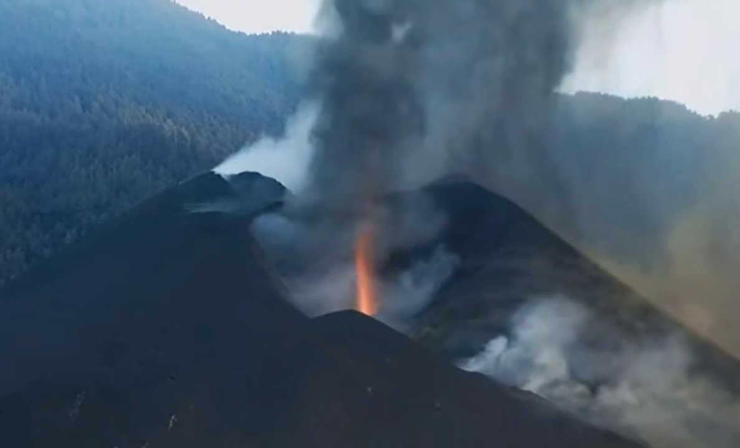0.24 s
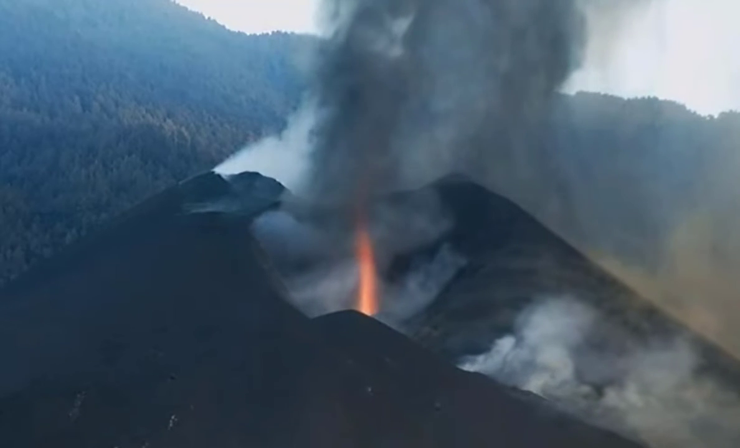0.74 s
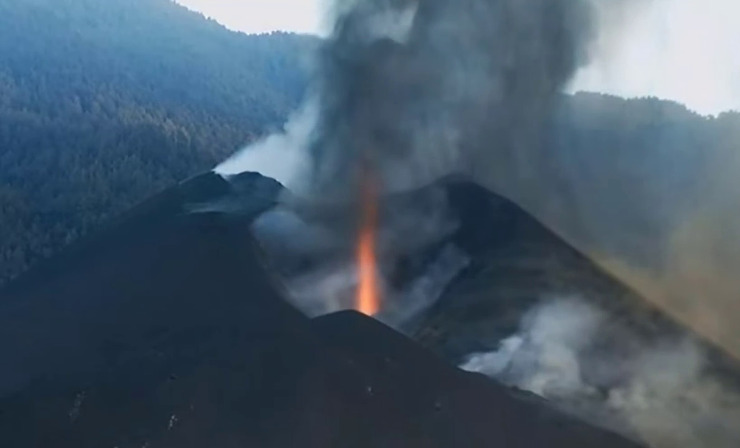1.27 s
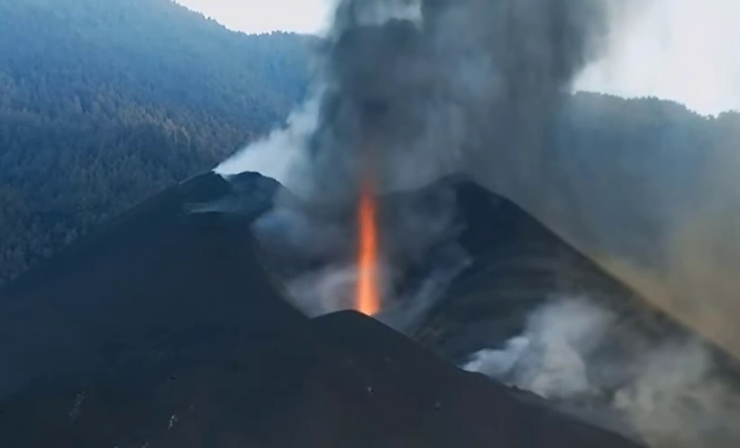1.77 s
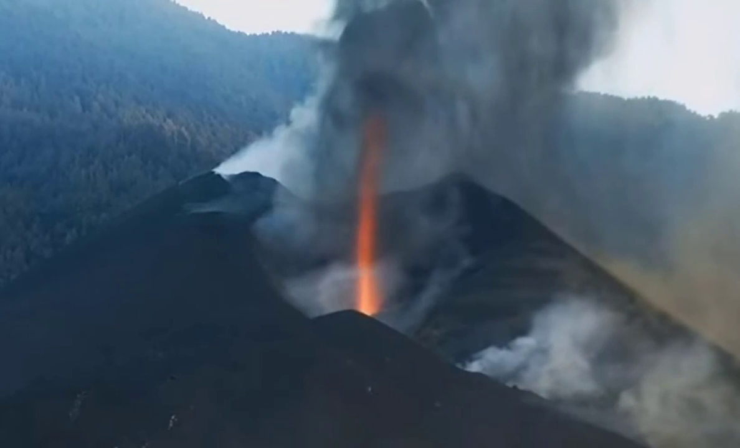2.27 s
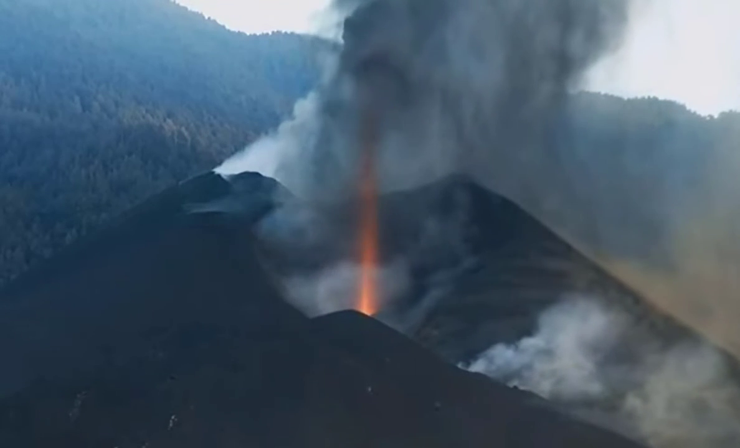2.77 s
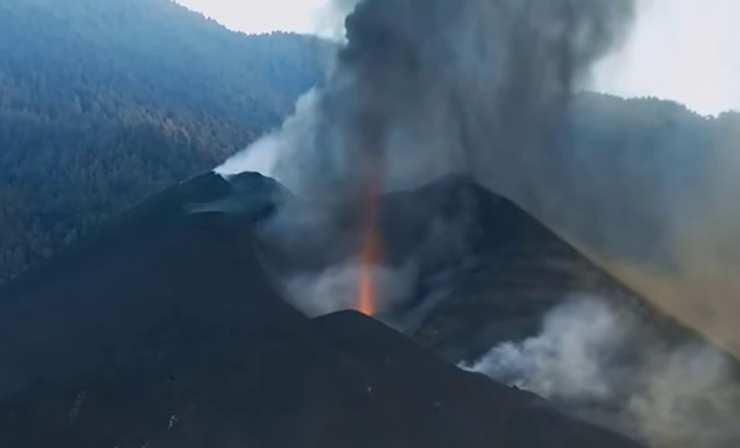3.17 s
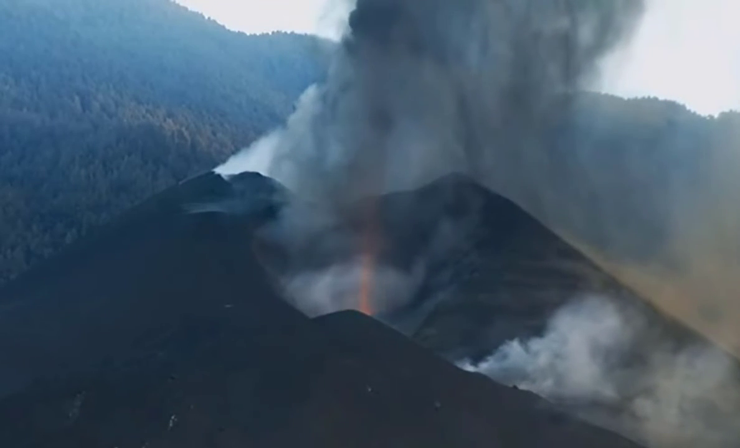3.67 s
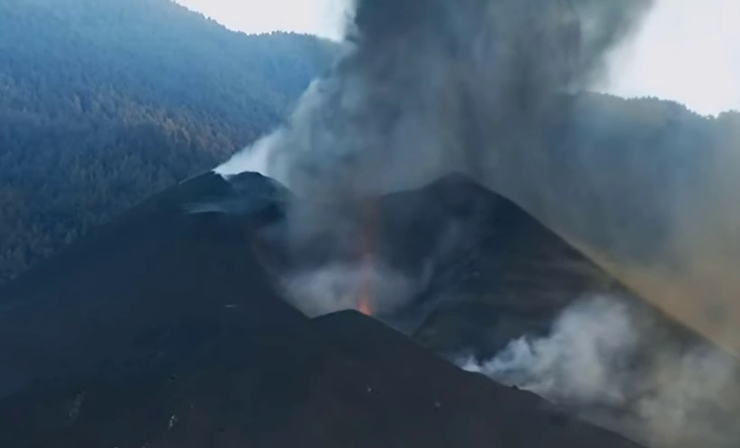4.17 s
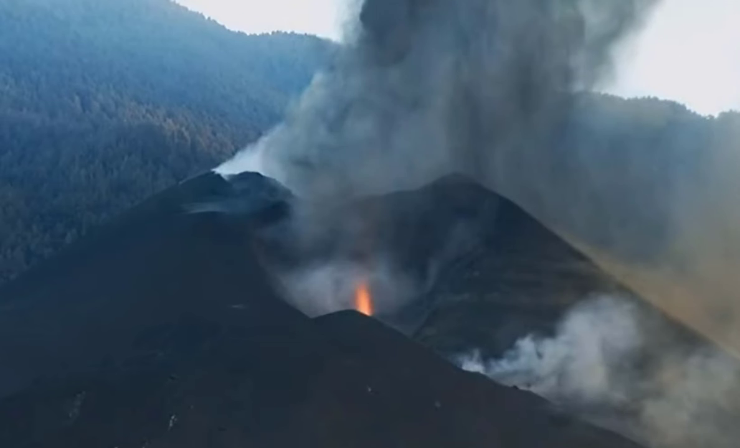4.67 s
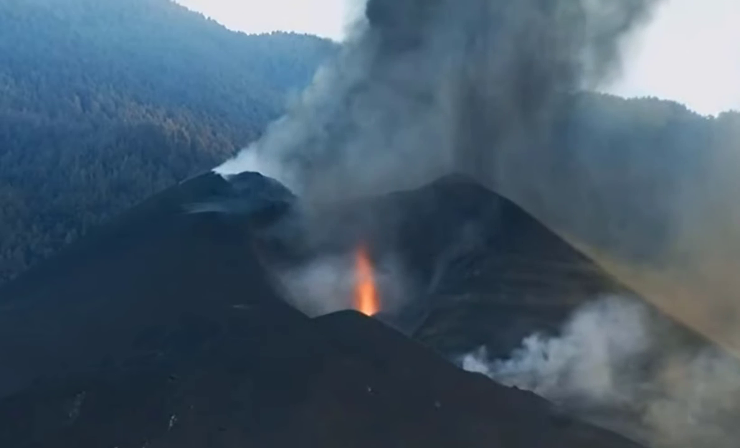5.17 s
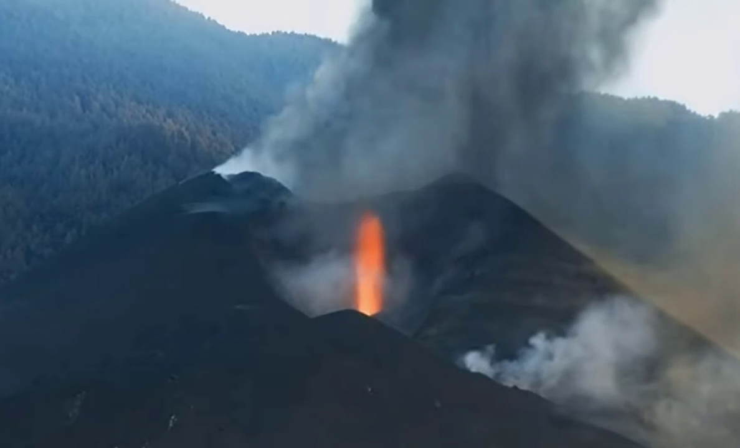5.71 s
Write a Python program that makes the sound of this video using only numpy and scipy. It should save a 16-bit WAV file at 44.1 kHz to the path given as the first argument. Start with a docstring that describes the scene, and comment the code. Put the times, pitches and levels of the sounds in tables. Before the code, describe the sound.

Distant eruption outdoors: low bassy gas-jet rumble with soft growl and dull rush, growing much louder in uneven waves over six seconds.

```python
"""A distant volcano vent blows a fountain of lava and ash across open slopes.
Three bands of shaped noise make the jet: large eddies rumble and surge, smaller ones growl, fine
turbulence rushes above them. It swells after a second and a half and builds unsteadily to the end;
distance has taken away its treble. Gas puffs and random flutter move the rumble.
A faint steady hiss of hillside air lies underneath."""
import sys
import numpy as np
from scipy import signal
from scipy.fft import rfft, irfft
from scipy.io import wavfile
from scipy.ndimage import uniform_filter1d

SR = 44100
rng = np.random.default_rng(int(sys.argv[2]) if len(sys.argv) > 2 else 0)


def unload_wav(signal):
    """Save mono or channel-first audio to the path in sys.argv[1] as 16-bit WAV at rate SR, clipped to [-1, 1]."""
    wavfile.write(
        sys.argv[1],
        SR,
        np.round(np.clip(np.atleast_2d(signal).T, -1, 1) * 32767).astype(np.int16),
    )


N = 262123
TIME_S = np.arange(N) / SR
BIN_HZ = np.maximum(np.arange(N // 2 + 1) * SR / N, 1)


def from_db(db):
    """Decibels to amplitude gain."""
    return 10 ** (np.asarray(db) / 20)


def in_time(rows):
    """Each column of a curve, interpolated at every sample."""
    row_s, *columns = np.transpose(rows)
    return [np.interp(TIME_S, row_s, column) for column in columns]


def spectrum_db(points):
    """Spectrum in dB at every bin, interpolated on a log-frequency axis."""
    known_hz, db = np.transpose(points)
    return np.interp(np.log(BIN_HZ), np.log(known_hz), db)


def bump(offset, width):
    """Smooth bump of height 1; width is taken at half height."""
    return np.exp2(-(2 * offset / width) ** 2)


def turbulence(gain, steady_s):
    """Random pressure of a given colour, its power held near 1 over spans of steady_s."""
    noise = irfft(rfft(rng.standard_normal(N)) * gain, N)
    span = max(int(steady_s * SR), 2)
    power = uniform_filter1d(noise ** 2, span)
    power = uniform_filter1d(power, span)
    return noise / np.sqrt(power + 1e-20)


# Colour of the hillside air. Each row: frequency in Hz, relative density in dB per Hz.
AIR_COLOUR = [(1000, 0.5), (2600, 0.5), (3300, -6.5), (5000, -13.5), (8000, -19), (12000, -33.5)]
AIR_DB = -79.5


def air():
    """Open air: a faint steady hiss of coloured noise."""
    colour = from_db(spectrum_db(AIR_COLOUR))
    return from_db(AIR_DB) * turbulence(colour, steady_s=0.5)


RUSH_STEADY_S = 0.45
# Colour of the rush. Each row: frequency in Hz, relative density in dB per Hz.
RUSH_COLOUR = [(450, -12.5), (680, -7.5), (850, -1), (1100, 1.5), (1500, -4.5), (1750, -11.5), (2000, -19),
               (2250, -27), (2750, -35), (3200, -46), (4400, -51), (5000, -47), (5900, -53), (15000, -66)]


def rush(rush_db):
    """Fine turbulence of the ash-laden jet: a smooth hiss, dulled by the long way through the air."""
    colour = from_db(spectrum_db(RUSH_COLOUR))
    return from_db(rush_db) * turbulence(colour, RUSH_STEADY_S)


FLUTTER_RMS_DB, FLUTTER_HZ = 0.93, 7


def flutter():
    """Weak random puffs in the gas flow: level wobble in dB, its band centred on FLUTTER_HZ."""
    ratio = BIN_HZ / FLUTTER_HZ
    band = ratio ** 2 / (1 + ratio ** 4)
    wobble = irfft(rfft(rng.standard_normal(N)) * band, N)
    return FLUTTER_RMS_DB * wobble / wobble.std()


SURGE_WIDTH_S = 0.065
# Strong puffs of gas. Each row: centre in seconds, lift of the rumble in dB.
SURGES = [(1.74, 4.5), (2.26, 4), (3.32, 4), (3.44, 3.5), (3.68, 6.5), (4.258, 4.5), (5.16, 3)]


def surges():
    """Strong gas puffs: lift of the rumble in dB, each swelling and sinking in the same bump."""
    return sum(lift_db * bump(TIME_S - centre_s, SURGE_WIDTH_S) for centre_s, lift_db in SURGES)


GROWL_FROM_HZ = 288.6
RUMBLE_STEADY_S, GROWL_STEADY_S = 0.052, 0.11
# Overall colour of the roar. Each row: frequency in Hz, relative density in dB per Hz.
ROAR_COLOUR = [(12, -64.5), (27, -52), (36, -40), (50, -31.5), (64, -23), (80, -15.5), (110, -5.5),
               (160, -0.5), (210, -3), (280, -11), (400, -18), (500, -25), (620, -33), (800, -47.5),
               (1300, -84.5)]
# Broad resonances and hollows of crater and slopes. Each row: centre in Hz, width in Hz, gain in dB.
TERRAIN = [(64, 10, 0.5), (120, 17, 3), (157.1, 14.4, 6), (169.7, 19, -2), (201.4, 28, 3), (228, 8.8, -3),
           (247.6, 22, 3.5), (276, 22, -2.5), (294.4, 16, 2.5), (334.2, 25, 6.5), (359.4, 17, -4),
           (479.4, 17, 4)]


def roar(rumble_db, growl_db):
    """Large and small eddies share one colour and one terrain, but surge separately."""
    terrain_db = sum(db * bump(BIN_HZ - centre_hz, width_hz) for centre_hz, width_hz, db in TERRAIN)
    colour = from_db(spectrum_db(ROAR_COLOUR) + terrain_db)
    large_share = 1 / (1 + (BIN_HZ / GROWL_FROM_HZ) ** 16)  # share of power
    large_eddies = turbulence(colour * np.sqrt(large_share), RUMBLE_STEADY_S)
    small_eddies = turbulence(colour * np.sqrt(1 - large_share), GROWL_STEADY_S)
    return from_db(rumble_db) * large_eddies + from_db(growl_db) * small_eddies


# Slow swell of the jet, before puffs and flutter.
# Each row: time in seconds, rumble level in dB, growl level in dB, rush level in dB.
JET = [(0.0, -37.5, -49.5, -59), (1.05, -35.5, -47.5, -54.5), (1.48, -40, -49.5, -55.5),
       (1.7, -34.0, -45.5, -51.5), (2.03, -32.0, -41, -50.0), (2.23, -25.5, -34, -42.5),
       (2.5, -25.5, -39.0, -47.0), (2.85, -22, -32, -43.0), (3.15, -23.5, -33, -44.5),
       (3.35, -23.0, -31.5, -43), (3.8, -22.5, -33.5, -44.0), (4.08, -24.5, -37, -46),
       (4.43, -20, -32, -39), (4.78, -21.5, -35.0, -44.0), (5.18, -17, -30.5, -40), (5.5, -16, -28.5, -39),
       (5.66, -20, -31, -40.5), (5.84, -17.5, -28, -38.0)]


def jet():
    """Gas jet: eddies of three sizes follow their own swells; puffs and flutter move the largest."""
    rumble_db, growl_db, rush_db = in_time(JET)
    rumble_db = rumble_db + surges() + flutter()
    return roar(rumble_db, growl_db) + rush(rush_db)


FADE_IN_S = 0.01


def scene():
    """The whole jet over the hillside air, with a short fade-in."""
    fade_in = np.minimum(TIME_S / FADE_IN_S, 1)
    return (fade_in * (jet() + air()))[None]


CLOCK_HZ, CUTOFF_HZ = 48000, 15620


def record(dry):
    """Sampling at the nearest tick of a faster clock adds a faint fizz; a steep low-pass cuts the top."""
    slip_ticks = (np.arange(N) * CLOCK_HZ / SR) % 1 - 0.5
    slip_samples = slip_ticks * SR / CLOCK_HZ
    sampled = dry - slip_samples * np.gradient(dry, axis=-1)  # first-order timing error
    low_pass = signal.ellip(14, 0.1, 80, CUTOFF_HZ, fs=SR, output="sos")  # order, ripple dB, stop dB
    return signal.sosfilt(low_pass, sampled)


dry = scene()
out = record(dry)
unload_wav(out)
```